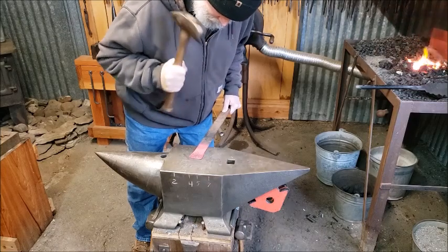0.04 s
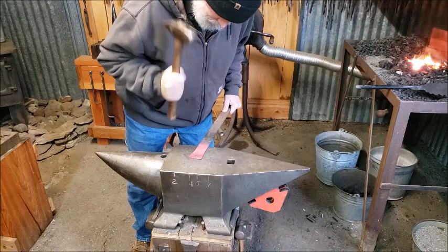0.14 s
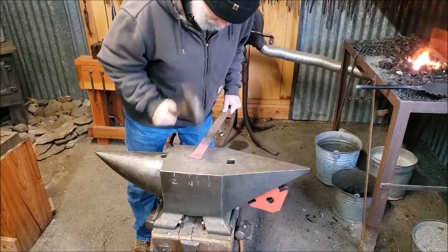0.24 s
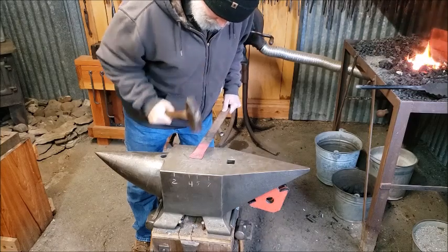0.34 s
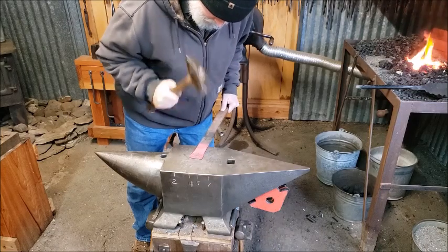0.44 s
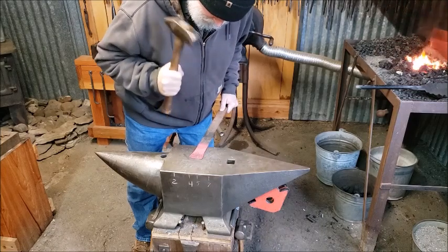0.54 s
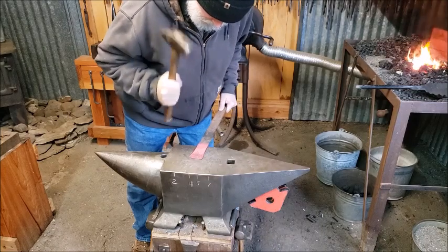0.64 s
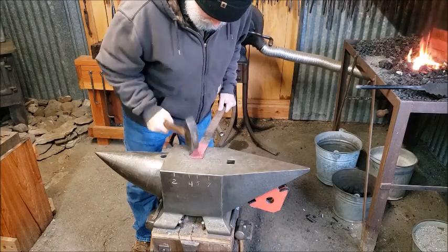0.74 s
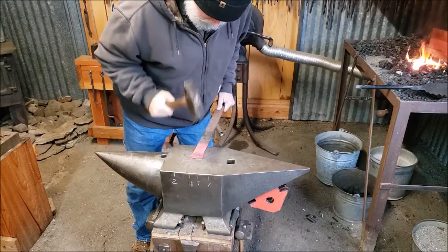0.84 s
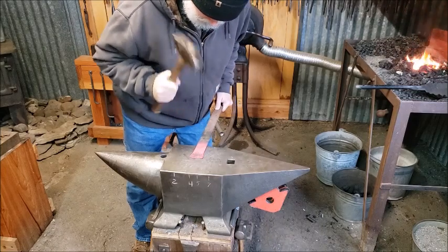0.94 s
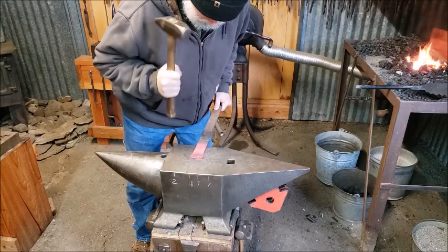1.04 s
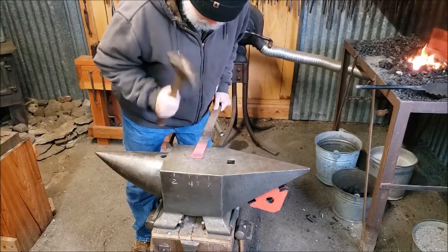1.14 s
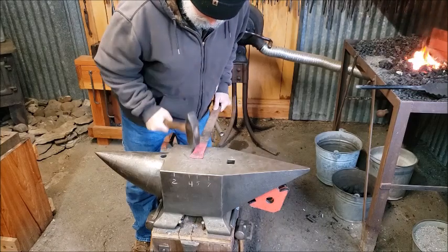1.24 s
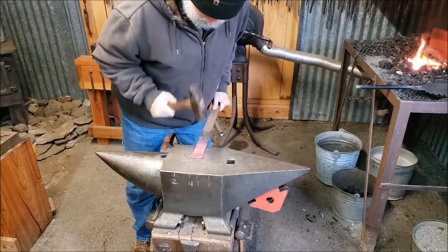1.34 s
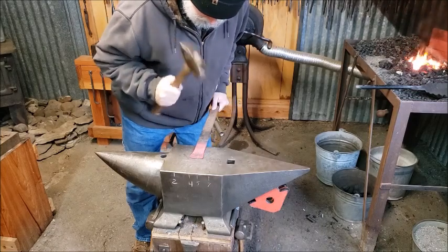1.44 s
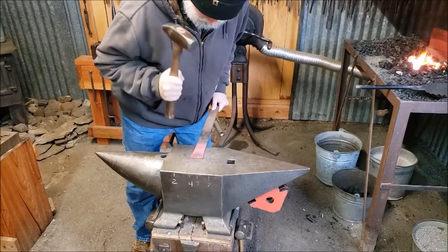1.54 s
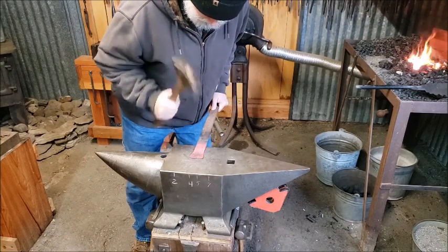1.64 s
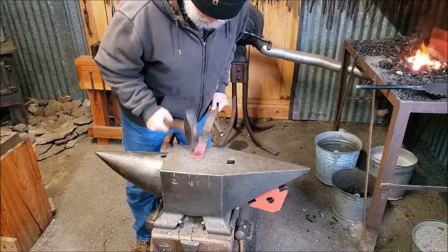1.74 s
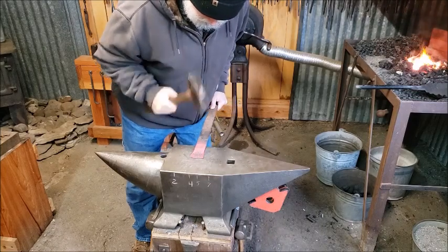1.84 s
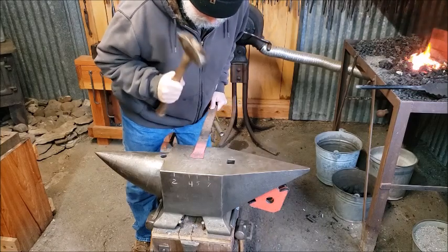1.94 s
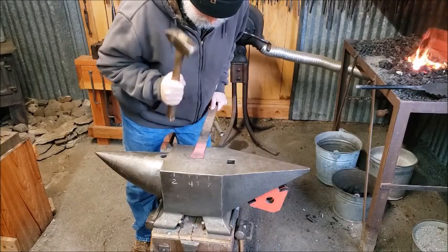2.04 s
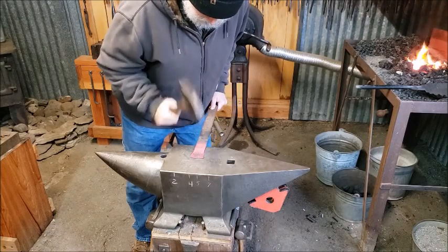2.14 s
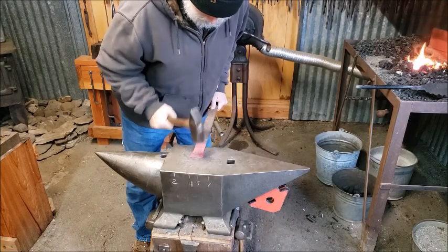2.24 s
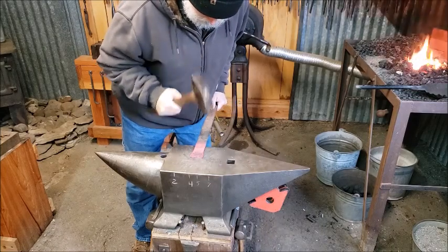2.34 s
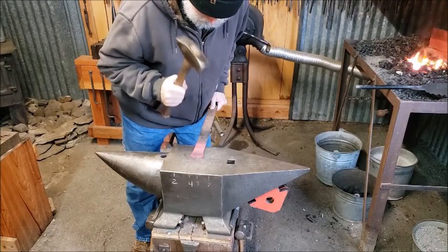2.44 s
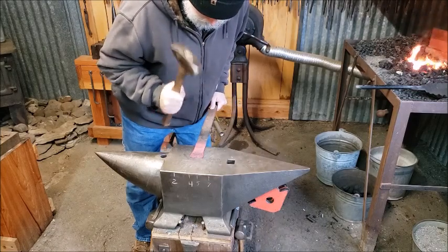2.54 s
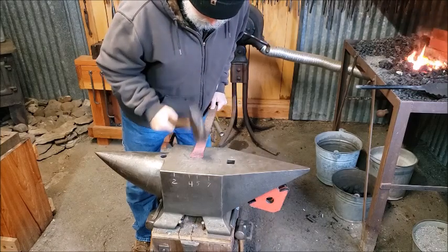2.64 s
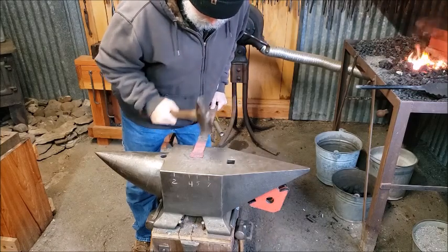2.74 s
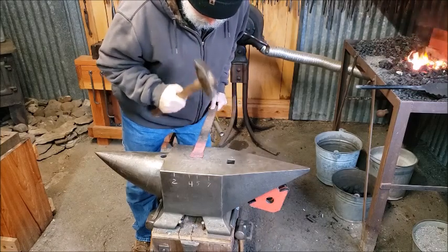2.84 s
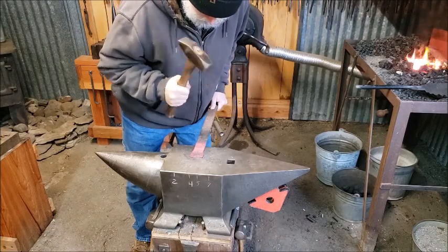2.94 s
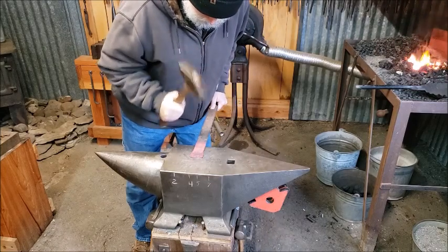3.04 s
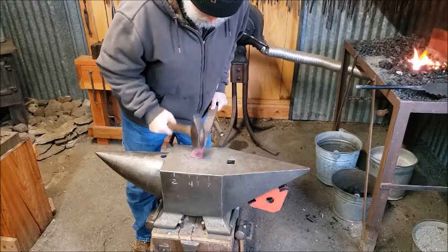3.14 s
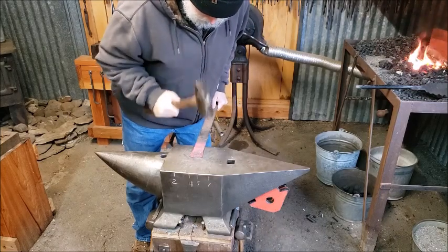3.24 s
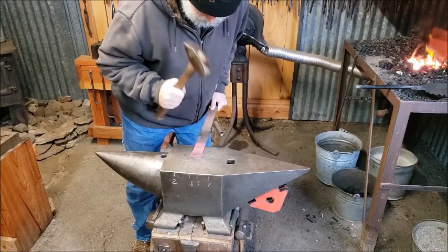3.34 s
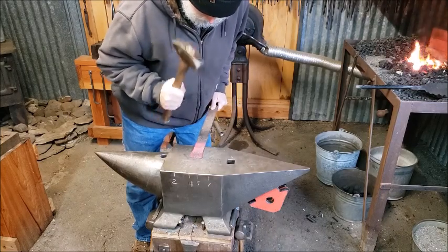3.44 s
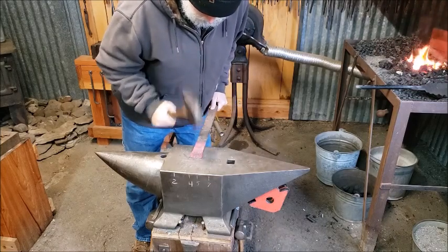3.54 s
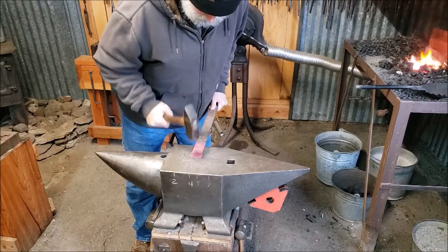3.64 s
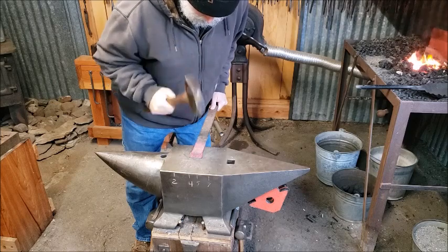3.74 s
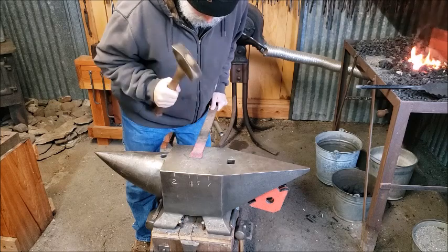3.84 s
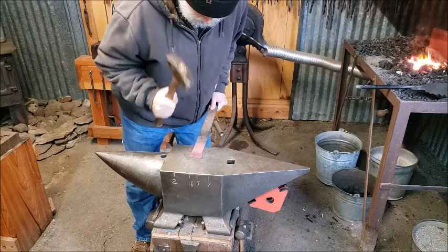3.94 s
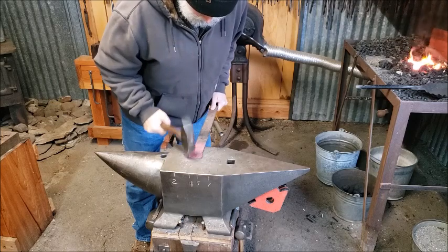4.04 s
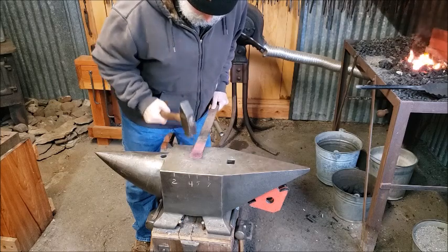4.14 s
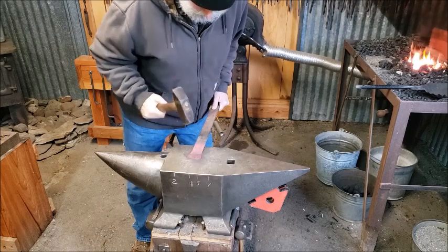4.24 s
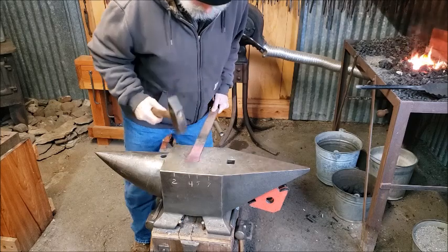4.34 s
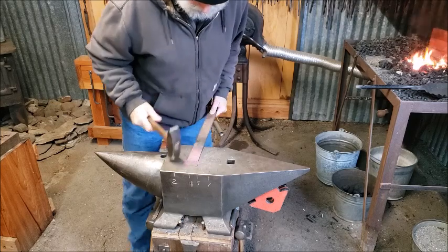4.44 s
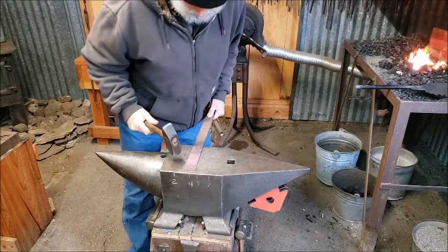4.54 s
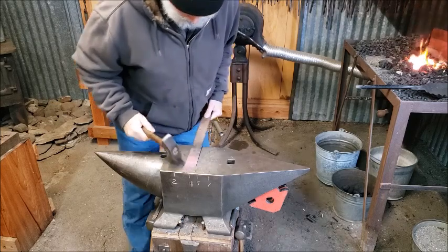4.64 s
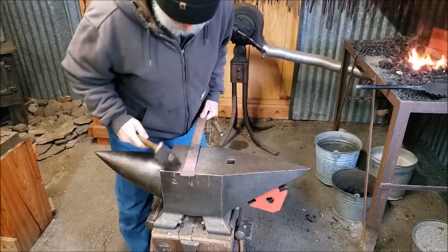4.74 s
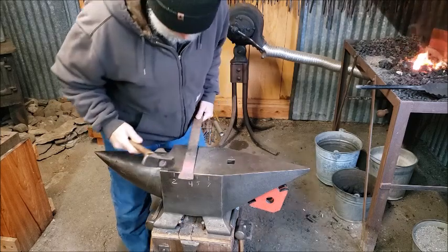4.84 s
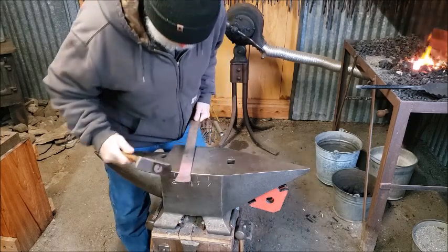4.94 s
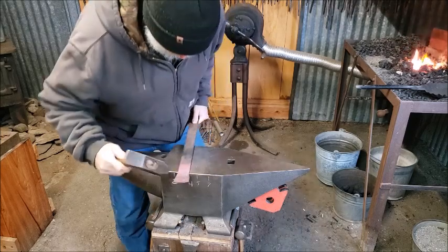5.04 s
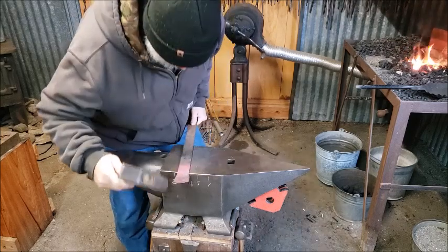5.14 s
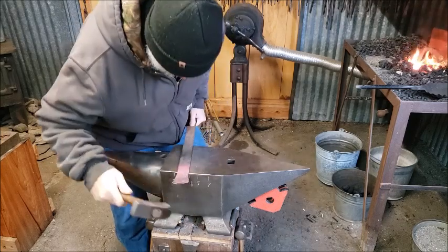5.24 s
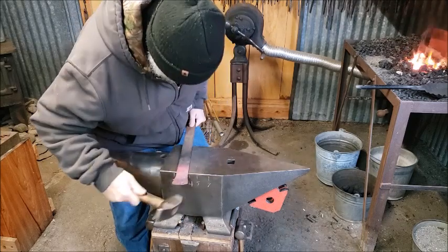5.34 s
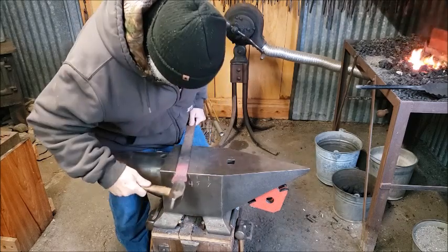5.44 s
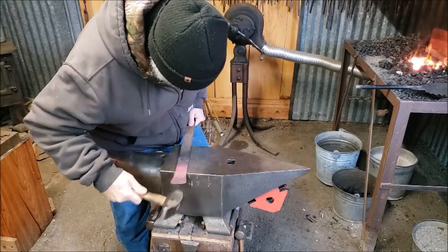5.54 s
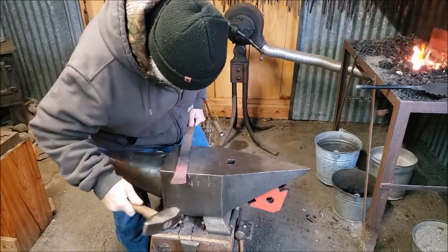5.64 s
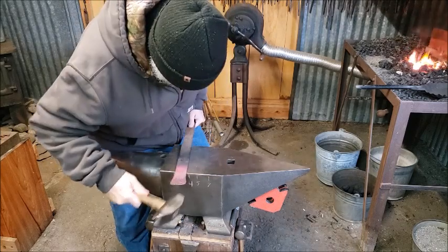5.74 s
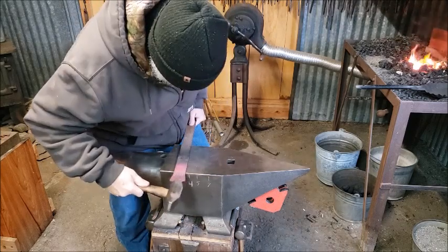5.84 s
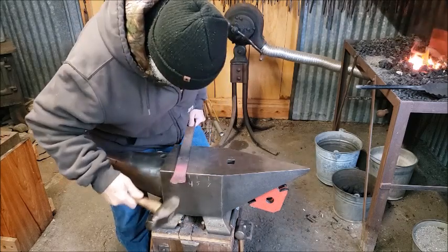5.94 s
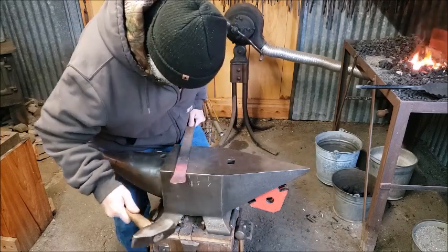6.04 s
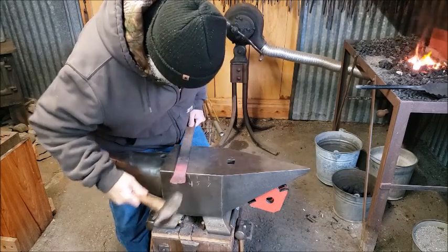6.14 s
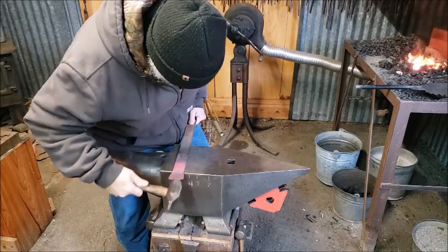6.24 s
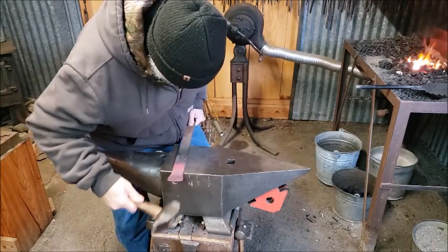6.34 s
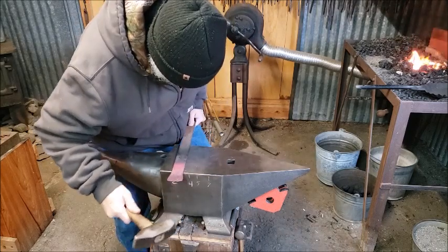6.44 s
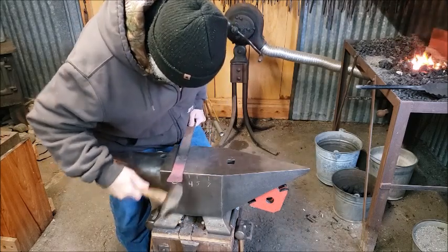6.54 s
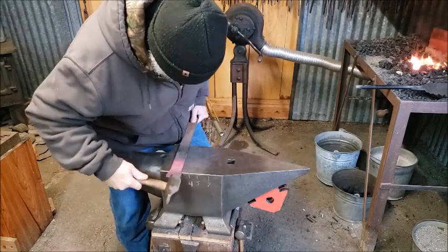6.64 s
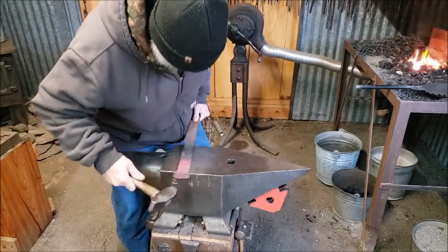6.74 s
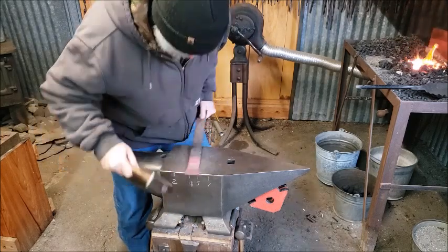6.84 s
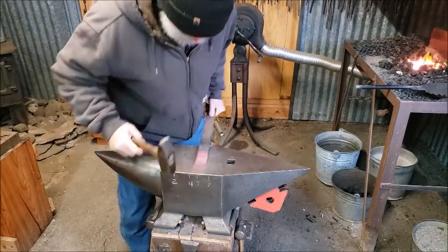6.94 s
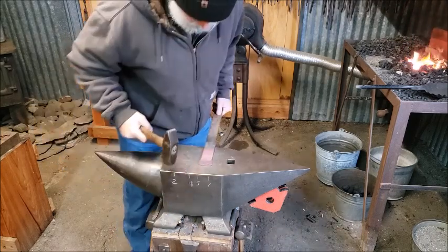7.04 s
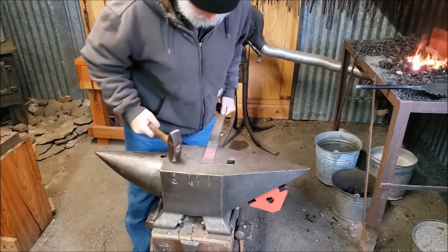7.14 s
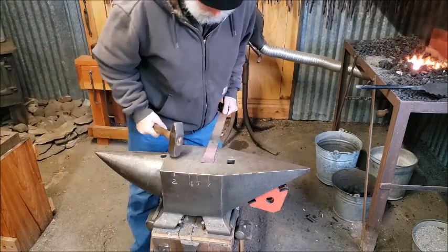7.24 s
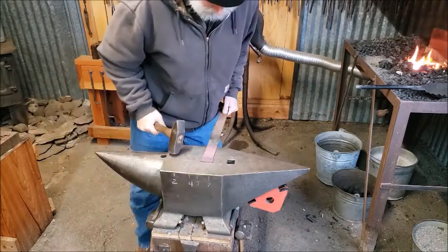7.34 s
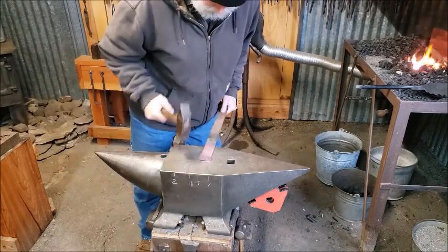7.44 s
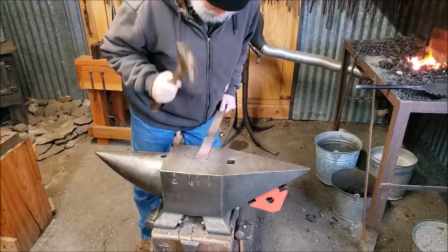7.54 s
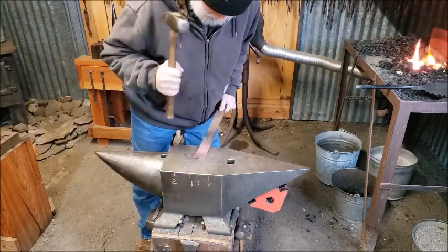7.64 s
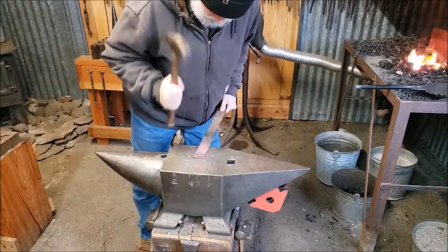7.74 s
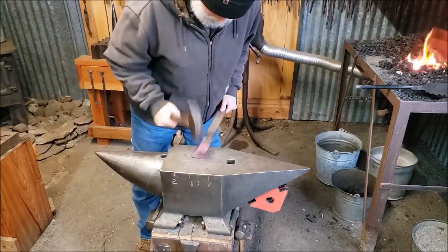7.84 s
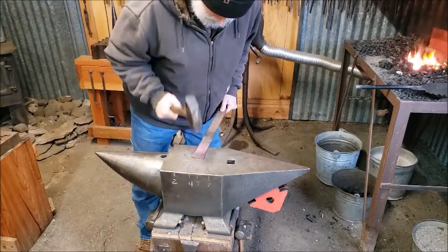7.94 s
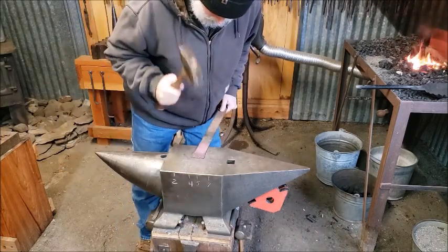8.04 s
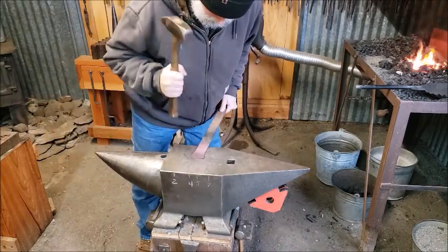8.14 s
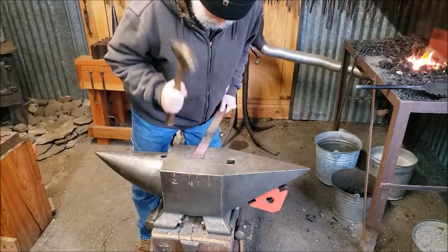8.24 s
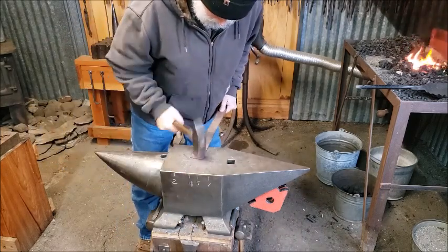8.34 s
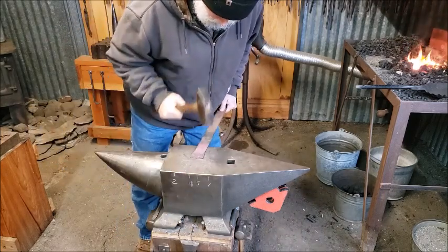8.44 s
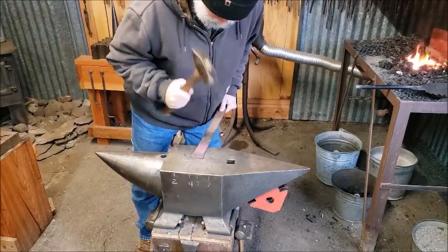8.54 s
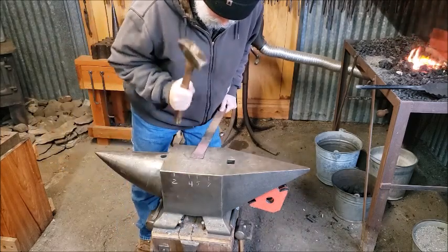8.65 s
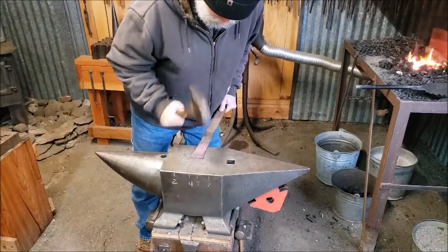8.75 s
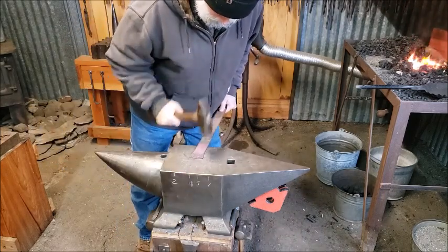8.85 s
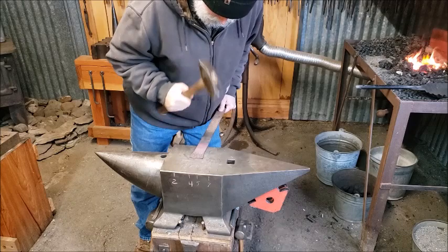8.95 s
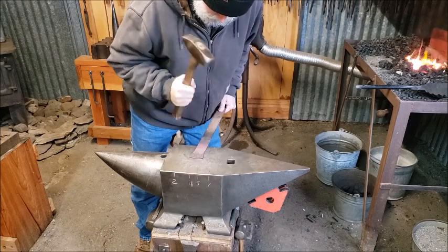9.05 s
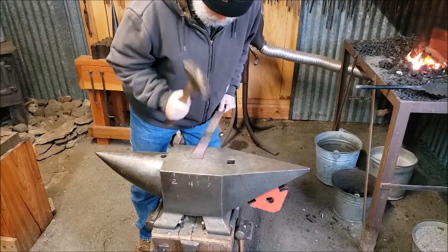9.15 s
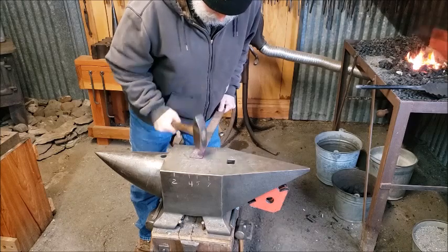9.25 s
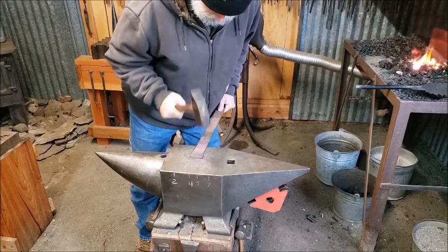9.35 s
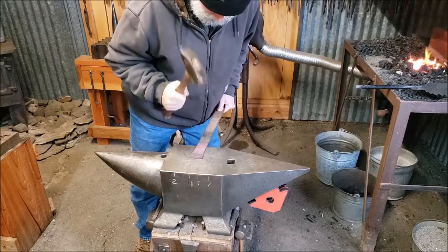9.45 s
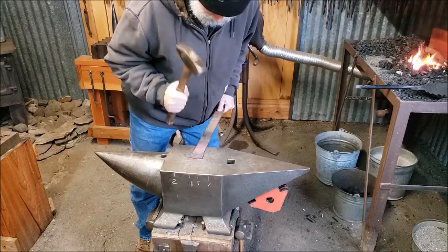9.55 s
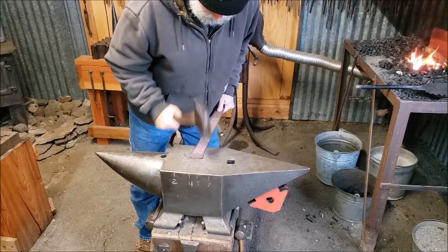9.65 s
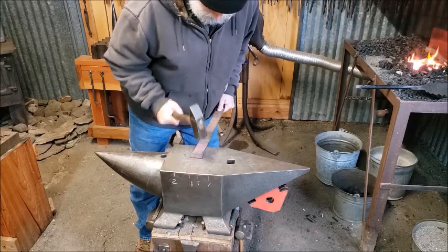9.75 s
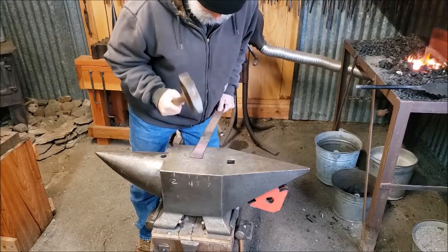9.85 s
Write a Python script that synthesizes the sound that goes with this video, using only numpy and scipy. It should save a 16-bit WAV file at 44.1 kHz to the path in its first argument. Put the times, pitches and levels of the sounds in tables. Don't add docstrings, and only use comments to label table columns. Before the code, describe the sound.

Heavy, cracking forge blows in steady rhythm, then softer taps, metal scrapes and quick ringing bounces on bare anvil, before the heavy blows resume.

```python
import sys
import numpy as np
from scipy import signal
from scipy.fft import rfft, irfft, next_fast_len
from scipy.io import wavfile
from scipy.ndimage import uniform_filter1d, map_coordinates

SR = 44100
rng = np.random.default_rng(int(sys.argv[2]) if len(sys.argv) > 2 else 0)


def boost(x):
    u = np.asarray(x, float) / 20
    return 10 ** u


def store_wav(level_fs):
    pcm = np.round(np.clip(np.atleast_2d(level_fs), -1, 1) * 32767)
    wavfile.write(sys.argv[1], SR, pcm.T.astype(np.int16))


N = 435708
LONG = int(1.5 * SR)

# start_s, peak_db, anvil_ring_db and boom_db (against the peak),
# thud_db (low weight of the crack)
FACE = [(0.347, -12.5, -21, -27.5, 3), (0.836, -13.5, -21.5, -28, 1.5), (1.324, -14, -17.5, -27, 4.5),
        (1.827, -12, -21, -28, 2.5), (2.292, -12, -32.5, -27, -1), (2.765, -12, -26.5, -33.5, -1),
        (3.227, -12.5, -26, -27, -0.5), (3.686, -13.5, -24, -32.5, -0.5), (4.148, -14, -24.5, -29, 0.5),
        (7.961, -10, -18.5, -33, 1), (8.443, -11.5, -33.5, -27, -1), (8.883, -11.5, -25.5, -29.5, -0.5),
        (9.319, -11.5, -17.5, -31.5, 5), (9.764, -11, -19, -32.5, 7)]
EDGE = [
    (5.497, -29.5, -43, -31, -2),
    (5.881, -22, -43, -54, -1.7),
    (6.272, -22.5, -55, -57, 0.66),
    (6.657, -19, -41, -61, 2.7),
]
# start_s, peak_db, anvil_ring_db (against the peak), thud_db,
# corner_db (brightness: a corner lands bright, the flat dull)
BOUNCE = [
    (4.561, -22.5, -17, -0.52, -1),
    (4.7357, -22, -13.5, -2, -4.5),
    (4.849, -29.5, -11, 1.6, 2),
    (7.2551, -23, -6, 0.22, -1.5),
    (7.323, -18.5, -10.5, 2, -1.5),
    (7.376, -20.5, -1.5, 2.3, -4.5),
    (7.434, -23, -7, 3.8, -3.5),
]
# pitch_hz, left_minus_right_db
LEAN = [(60, -1.2), (180, -.6), (550, .3), (1650, .8), (2600, .3), (4970, 1.2), (9500, -.3), (15000, 1.3)]


def along(points, hz):
    f, v = np.transpose(points)
    return np.interp(np.log(hz + 1), np.log(f + 1), v)


def unit(x):
    return x / np.sqrt(np.mean(x ** 2) + 1e-20)


def wobble(n, step):
    return map_coordinates(rng.standard_normal(n // step + 4), [np.arange(n) / step])


def resonances(peaks, f):
    powers = [np.abs(boost(db) * f * w / (c * c - f * f + 1j * f * w)) ** 2 for c, w, db in peaks]
    return np.sqrt(sum(powers))


def filtered(x, gain):
    m = next_fast_len(x.shape[1] + SR // 4)
    spectrum = rfft(x, m) * gain(np.fft.rfftfreq(m, 1 / SR))
    return irfft(spectrum, m)[:, :x.shape[1]]


def ports(n, gain):
    # pitch_hz, likeness (0 to 1)
    alike = [(60, .9), (150, .85), (380, .66), (950, .3), (2380, .15), (15000, .05)]
    lead_s = 2 / SR
    hz, t, (a, b) = signal.stft(rng.standard_normal((2, n)), SR, nperseg=512, noverlap=384)
    hz = hz[:, None]
    turn = np.arccos(np.clip(along(alike, hz), 0, 1)) / 2
    shift = np.exp(1j * np.pi * hz * lead_s) * boost(along(LEAN, hz) / 2)
    left = (np.cos(turn) * a + np.sin(turn) * b) * shift
    right = (np.cos(turn) * a - np.sin(turn) * b) / shift
    shaped = np.array([left, right]) * gain(hz, t)
    return signal.istft(shaped, SR, nperseg=512, noverlap=384)[1][:, :n]


def ring(pitches, modes, t, hold, scatter_db, beat_db, attack, turn):
    out = np.zeros((2, len(t)))
    side = np.array([[.5], [-.5]])
    for k, (hz, (db, t60, lead)) in enumerate(zip(pitches, modes)):
        where = np.broadcast_arrays([[0], [1]], 30 * t)
        waver = map_coordinates(rng.standard_normal((2, 60)), where, order=1)
        level_db = db + scatter_db * rng.standard_normal() + beat_db * waver + side * along(LEAN, hz)
        level_db = level_db - 60 * np.maximum(t - hold, 0) / t60
        tone = np.sin(2 * np.pi * hz * t + k * turn + side * lead)
        out += boost(level_db) * tone * (1 - np.exp(-t / attack))
    return out


def shed_crack(crack, humps, hold, snap_db, punch, punch_s, bright_db, thud_db, n):
    # pitch_hz, t60_s
    shed = [(80, .9), (280, 0.54), (740, 0.43), (1940, 0.4), (5120, 0.33), (9000, 0.25), (13500, 0.19)]
    late_db = -33.5
    t = np.arange(n) / SR
    clumps = 2.1 * rng.standard_normal(128)

    def fading(hz, u):
        fade_db = -60 * np.maximum(u - hold, 0) / along(shed, hz)
        return boost(fade_db) + boost(late_db + fade_db / 2)

    def tone(hz):
        thud = thud_db * np.exp(-((hz - 306) / 250) ** 2)
        ripple = map_coordinates(clumps, [hz / 180]) * (hz > 1500)
        colour = boost(along(crack, hz) + tilt(bright_db, hz) + ripple + thud)
        return colour * np.hypot(1, resonances(humps, hz))

    wash = filtered(ports(n, fading), tone)
    wash = wash / np.sqrt(np.mean(wash[:, :SR // 25] ** 2))
    depth_db = 0.68 * np.exp(-t / 0.16) * (1 - np.exp(-t / 0.022))
    wash = wash * boost(depth_db * wobble(n, 40))
    wash = wash * (1 - np.exp(-t / 0.00033)) * (1 + punch * boost(-60 * t / punch_s))
    snap = ports(2048, lambda hz, u: hz > 300)
    wash[:, :2048] += boost(snap_db - 60 * t[:2048] / 0.009) * snap
    return wash


def tilt(bright_db, hz):
    return bright_db * np.clip(np.log2(hz / 3000 + 1e-9) / 2, -1, 1)


def struck_steel(pitches, modes, has_head, ring_db, anvil_db, bright_db, t):
    head_hz = [2300, 2312]
    # level_db, t60_s, left_lead_rad
    head_modes = [(-5, .075, 1.2), (-5, .075, 1.2)]
    anvil_hz = [2491.5]
    # level_db, t60_s, left_lead_rad
    anvil_modes = [(3.4, 0.65, 0.81)]
    damped = [(db + tilt(bright_db, hz), min(t60, .34), lead)
              for hz, (db, t60, lead) in zip(pitches, modes)]
    steel = boost(ring_db) * ring(pitches, damped, t, hold=0.017, scatter_db=1.5, beat_db=7.5,
                                attack=0.0018, turn=0.98)
    if has_head:
        steel = steel + boost(ring_db + 1.5) * ring(head_hz, head_modes, t, hold=.036, scatter_db=0,
                                                  beat_db=1, attack=.004, turn=-1.3)
    return steel + boost(anvil_db) * ring(anvil_hz, anvil_modes, t, hold=0.12, scatter_db=1.0,
                                        beat_db=-1.5, attack=0.0083, turn=1)


def stump():
    sway_hz = [55.16, 61.1]
    # level_db, t60_s, left_lead_rad
    sway_modes = [(.5, 3.3, .1), (-.5, 2.9, .1)]
    return ring(sway_hz, sway_modes, np.arange(LONG) / SR, hold=0, scatter_db=2.5, beat_db=4.5,
                attack=.01, turn=2.8)


def blow(ring_db, anvil_db, bright_db, boom_db, thud_db, free_s, pitches, modes, has_head, **contact):
    n = int(.8 * SR)
    t = np.arange(n) / SR
    wash = shed_crack(bright_db=bright_db, thud_db=thud_db, n=n, **contact)
    steel = struck_steel(pitches, modes, has_head, ring_db, anvil_db, bright_db, t)
    steel = steel * np.clip((free_s + .004 - t) / .004, 0, 1)
    fade_out = np.clip((n / SR - t) / .1, 0, 1)
    near = np.pad((wash + steel) * fade_out, ((0, 0), (0, LONG - n)))
    return near + boost(boom_db) * stump()


def place_blows(rows, usual, slopes, trim_db, **kind):
    usual_db, usual_ring_db, usual_bright_db = usual
    contacts = np.sort([row[0] for row in FACE + EDGE + BOUNCE] + [N / SR + 1])
    out = np.zeros((2, N + LONG + SR))
    for s, db, anvil_db, boom_db, thud_db, corner_db in rows:
        harder_db = db - usual_db
        ring_db = usual_ring_db + slopes[0] * harder_db
        bright_db = usual_bright_db + slopes[1] * harder_db + corner_db
        free_s = contacts[contacts > s][0] - s
        at = SR + round((s + .0007) * SR)
        out[:, at:at + LONG] += boost(db + trim_db) * blow(ring_db, anvil_db, bright_db, boom_db, thud_db,
                                                         free_s, **kind)
    return out[:, SR:SR + N]


def face_blows():
    earlier = [
        (-.13, -15, -18, -26.5, -1),
    ]
    # pitch_hz, level_db (per Hz)
    crack = [(35, -46.5), (70, -12.5), (170, -18), (500, -16.5), (1300, -14.5), (2500, -11), (7300, -12.5),
             (8000, -18), (11500, -10.5), (16000, -11)]
    # pitch_hz, width_hz, level_db (over the crack)
    humps = [(650, 120, 3), (2306, 60, 6), (4450, 90, 8), (4950, 70, 7), (5830, 160, 6), (6470, 60, 7),
             (9520, 90, 7), (11550, 400, 3)]
    pitches = [2306, 9515, 11088, 11553, 12781, 13920, 14070, 14250, 10388, 14400, 2176, 4470, 4947, 5765,
               5901, 6465, 7360]
    # level_db, t60_s, left_lead_rad
    modes = [(-9, 0.75, .8), (-20.5, .2, .8), (-4.5, 0.23, 0.58), (-2, 0.16, .8), (-13, .25, .8),
             (-21.5, .35, .8), (-23, .3, .8), (-14.5, .35, .8), (-6.5, 0.36, 0.67), (-16, .35, .8),
             (-10.5, .2, 0.97), (-15.5, 0.12, 0.75), (-11, .3, .8), (-15, 0.67, 0.67), (-12.5, 0.26, 0.53),
             (-18.5, 0.14, 0.86), (-11.5, 0.29, 0.58)]
    rows = [row + (0,) for row in earlier + FACE]
    # peak dB, ring dB against the peak, brightness dB
    return place_blows(rows, usual=(-11.5, -10.5, 0.24), slopes=(-1.3, 0.19), trim_db=-3,
                       crack=crack, humps=humps, pitches=pitches, modes=modes, has_head=True,
                       hold=.035, snap_db=1.5, punch=.9, punch_s=.012)


def patchy(points):
    def gain(hz, t):
        grain = rng.standard_normal((len(hz), len(t)))
        patches = unit(uniform_filter1d(uniform_filter1d(grain, 8, 0), 20, 1))
        return boost(along(points, hz) + 1.2 * patches)
    return unit(ports(N, gain))


def fire():
    # pitch_hz, level_db (per Hz)
    breath = [(30, -20), (60, -5), (130, -20.5), (320, -29.5), (1100, -38.5), (5000, -41.5), (8500, -45.5),
              (12000, -35), (16000, -45)]
    return boost(-71.0) * patchy(breath)


def stroke_gain(rows, rise, sag, fall, column=2):
    t = np.arange(N) / SR
    total = 0
    for row in rows:
        before = np.maximum(row[0] - t, 0)
        since = np.maximum(t - row[0], 0)
        after = np.maximum(t - row[0] - row[1], 0)
        total = total + boost(row[column] - rise * before - sag * since - fall * after)
    return total


def sleeves():
    # start_s (at full strength), length_s, level_db
    moves = [(4.3, 0.5, -73), (4.62, 0.12, -66.5), (4.78, .07, -66.5), (4.9, 0.16, -72), (5.33, .05, -76),
             (5.46, 0.053, -83), (5.49, .02, -86.5), (5.825, 0.055, -81), (6.05, 0.06, -80),
             (6.2, 0.073, -75), (6.6, .02, -79), (6.65, .02, -70), (6.83, 0.21, -63), (7.08, 0.15, -67.5),
             (7.47, 0.23, -60), (7.795, 0.22, -66.5)]
    # pitch_hz, level_db (per Hz)
    hiss = [(300, -26.5), (1500, -5.5), (3000, -9.5), (5500, -4.5), (8500, -13), (12000, -4),
            (16000, -10.5)]
    return stroke_gain(moves, rise=370, sag=24, fall=200) * boost(13) * patchy(hiss)


def drag():
    # start_s (at full strength), length_s, edge_db, body_db
    strokes = [
        (4.47, 0.12, -48.5, -64),
        (6.8, 0.11, -50.5, -47.5),
        (7.0, 0.068, -41, -51.5),
        (7.11, .03, -50.5, -48),
        (7.16, 0.018, -56.5, -47.5),
        (7.21, .04, -58, -62),
    ]
    # pitch_hz, width_hz, level_db
    steel_peaks = [(1930, 28, 1), (3340, 45, -6), (3900, 50, -10), (4480, 40, -7), (5050, 55, -3),
                   (5850, 40, -6), (6520, 40, -9), (7240, 50, -13), (8930, 42, -18), (11900, 80, -9),
                   (12600, 37, -11)]
    # pitch_hz, level_db
    high_range = [(3000, -40), (4200, -3), (5300, 0), (7000, -5), (9000, -9), (12000, -4), (16000, -7)]
    # pitch_hz, level_db
    low_range = [(900, -40), (1700, 0), (3500, 0), (4500, -30)]
    out = 0
    for column, span, floor_db in [(2, high_range, -14), (3, low_range, -17)]:
        def tone(f):
            return np.hypot(boost(floor_db), resonances(steel_peaks, f)) * boost(along(span, f))
        grit = boost(2 * wobble(N, 500))
        scrape = unit(grit * filtered(ports(N, lambda hz, t: 1), tone))
        out = out + stroke_gain(strokes, rise=250, sag=22, fall=230, column=column) * scrape
    return boost(-2.0) * out


def bounces():
    # pitch_hz, level_db (per Hz)
    crack = [(35, -47), (70, -15), (500, -14.5), (2500, -11.5), (4400, -19.5), (6300, -27), (8500, -33.5),
             (11600, -25), (16000, -41.5)]
    # pitch_hz, width_hz, level_db (over the crack)
    humps = [(1020, 100, 8), (2306, 70, 12), (3445, 130, 10), (4280, 200, 8), (7460, 120, 8),
             (9515, 120, 14), (11555, 150, 10), (12690, 120, 12)]
    pitches = [2306, 9515, 11088, 11555, 12690, 5350, 14070, 14250, 10375, 3445, 4280]
    # level_db, t60_s, left_lead_rad
    modes = [(-2, 0.23, 0.62), (-7.5, 0.11, 1), (-38, 0.3, .8), (-8, 0.21, 1), (-14, 0.18, .8),
             (-22, 0.2, .8), (-37, .2, .8), (-28, 0.15, .8), (-9, 0.23, 1), (-20, 0.18, .8),
             (-15.5, 0.2, .8)]
    boom_db = -28
    rows = [row[:3] + (boom_db,) + row[3:] for row in BOUNCE]
    return place_blows(rows, usual=(-19, -0.28, 2), slopes=(.3, .5), trim_db=-11,
                       crack=crack, humps=humps, pitches=pitches, modes=modes, has_head=True,
                       hold=.004, snap_db=-3, punch=1.6, punch_s=.12)


def handle():
    # start_s, pitch_hz, level_db, t60_s
    knocks = [
        (4.735, 1070, -33, 0.23),
        (7.321, 997, -32, 0.27),
        (7.379, 1036, -42, 0.19),
    ]
    out, t = np.zeros((2, N)), np.arange(SR // 2) / SR
    for s, hz, db, t60 in knocks:
        knock = ring([hz], [(db, t60, .4)], t, hold=0.013, scatter_db=0, beat_db=1, attack=0.0022, turn=0)
        out[:, round(s * SR):][:, :len(t)] += knock
    return out


def edge_blows():
    # pitch_hz, level_db (per Hz)
    crack = [(35, -44), (70, -32), (300, -14), (850, -7), (1300, -11), (2500, -7), (7000, -7.5),
             (8300, -11.5), (11900, -2), (16000, -11)]
    # pitch_hz, width_hz, level_db (over the crack)
    humps = [(870, 140, 2), (1950, 70, 7), (2350, 300, 5), (2850, 80, 5), (4480, 110, 12), (5080, 80, 5),
             (6530, 100, 6), (7370, 80, 5)]
    pitches = [1950, 4480, 9520, 10388, 2311]
    # level_db, t60_s, left_lead_rad
    modes = [(-8, 0.25, .8), (-6, 0.45, 0.95), (-9, 0.17, .8), (-21, 0.38, 0.9), (-5, .3, .8)]
    rows = [row + (0,) for row in EDGE]
    return place_blows(rows, usual=(-20.5, -12, -1.5), slopes=(-1.3, 0.19), trim_db=-3,
                       crack=crack, humps=humps, pitches=pitches, modes=modes, has_head=False,
                       hold=.02, snap_db=-1.5, punch=.9, punch_s=.012)


def scene():
    hammer = face_blows() + bounces() + edge_blows()
    return hammer + fire() + sleeves() + drag() + handle()


def top_cut(x):
    return signal.sosfilt(signal.butter(12, 16830, fs=SR, output="sos"), x)


def record(dry):
    # pitch_hz, level_db
    microphone = [(12, -30), (40, 0), (15650, 0), (15900, -28), (16750, -34), (16900, -100)]
    ceiling = .75
    heard = dry / (1 + np.abs(dry / ceiling) ** 4) ** (1 / 4)
    mix = filtered(heard, lambda hz: boost(along(microphone, hz)))
    return top_cut(mix)


dry = scene()
out = record(dry)
store_wav(out)
```